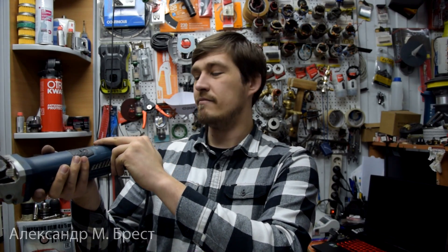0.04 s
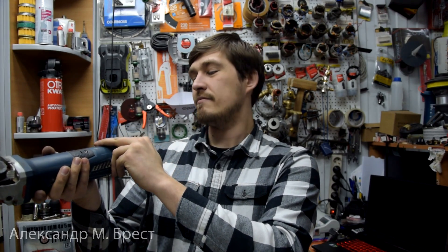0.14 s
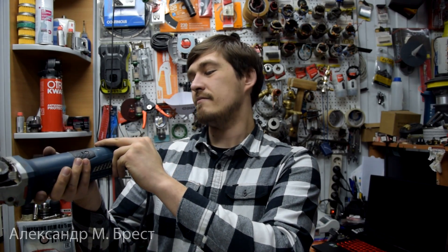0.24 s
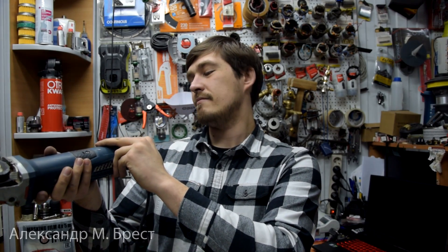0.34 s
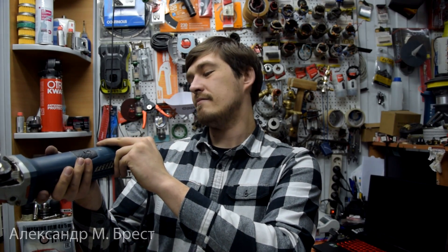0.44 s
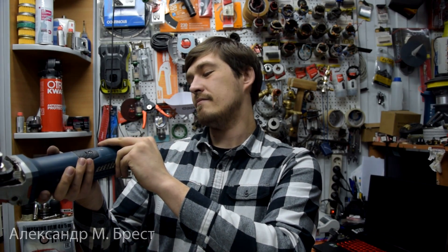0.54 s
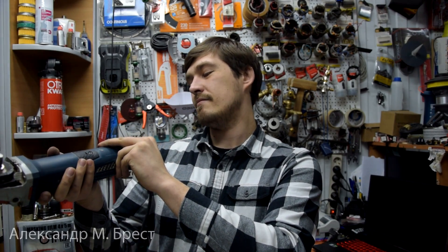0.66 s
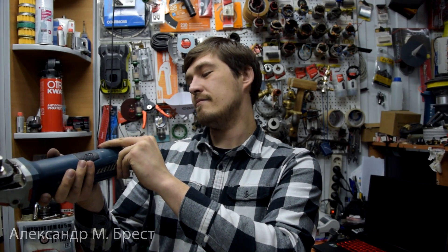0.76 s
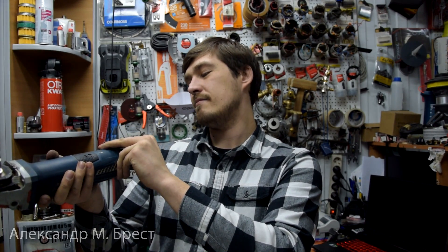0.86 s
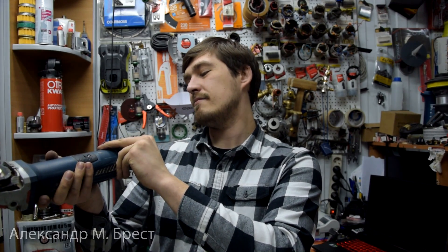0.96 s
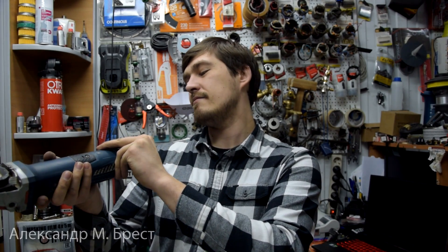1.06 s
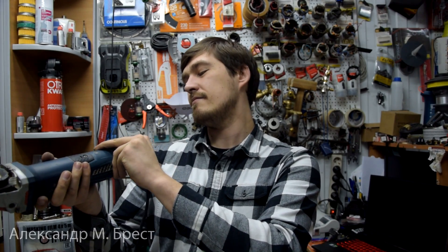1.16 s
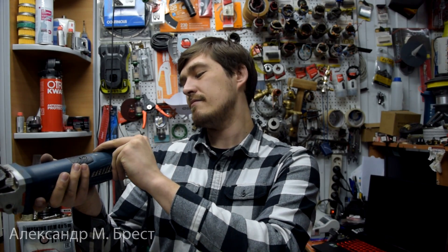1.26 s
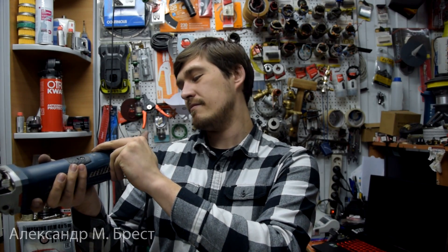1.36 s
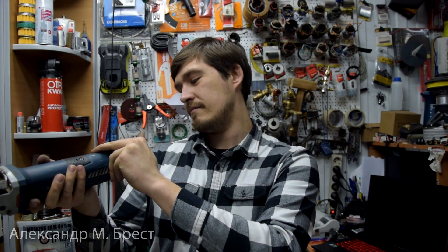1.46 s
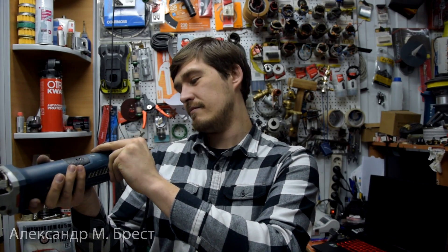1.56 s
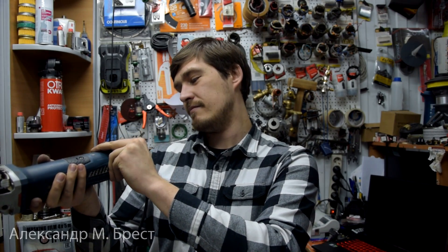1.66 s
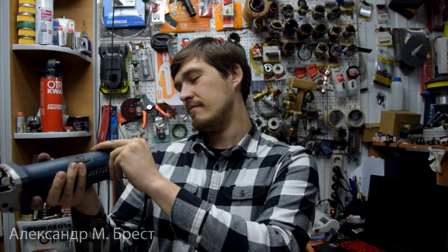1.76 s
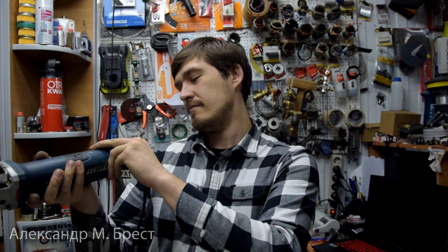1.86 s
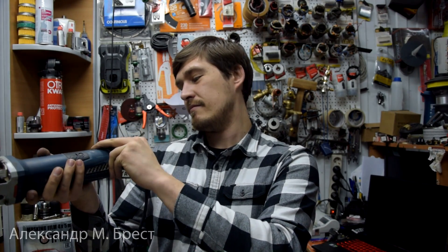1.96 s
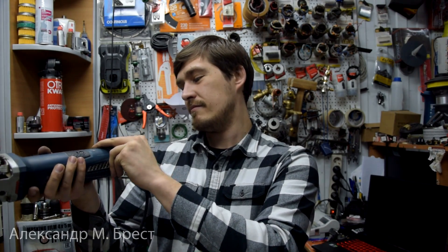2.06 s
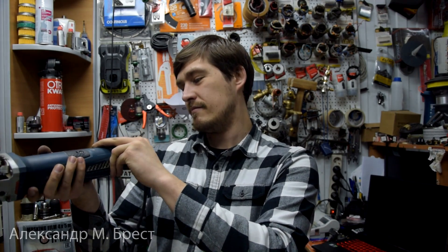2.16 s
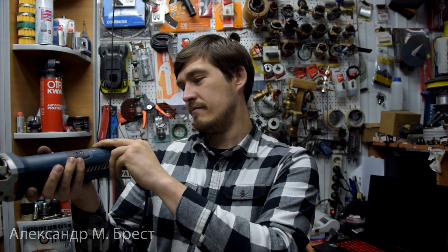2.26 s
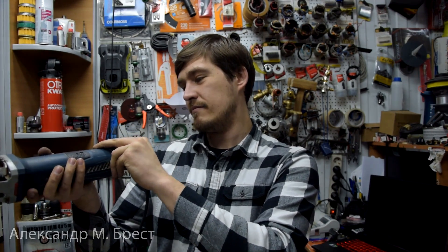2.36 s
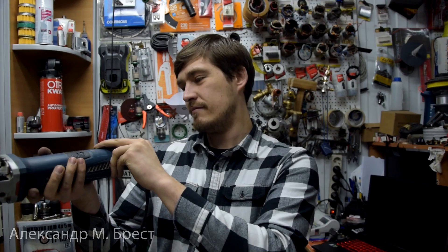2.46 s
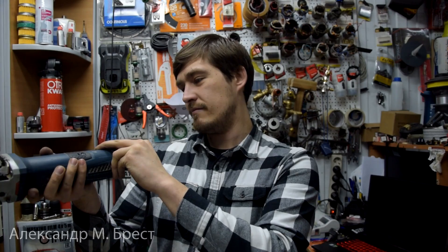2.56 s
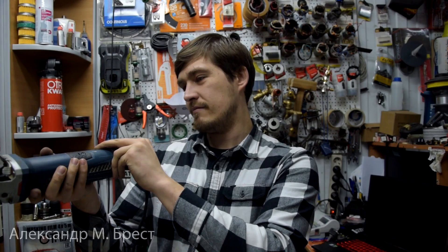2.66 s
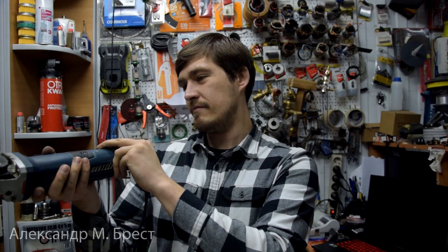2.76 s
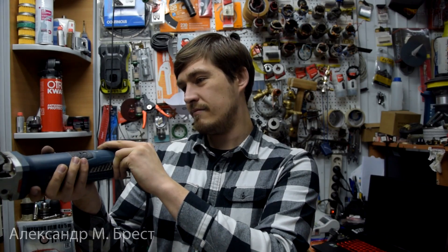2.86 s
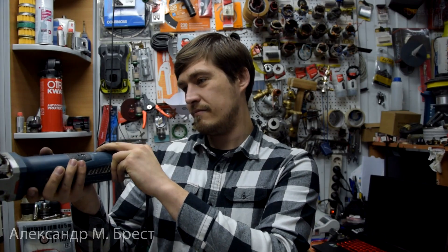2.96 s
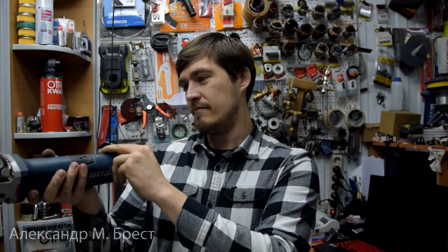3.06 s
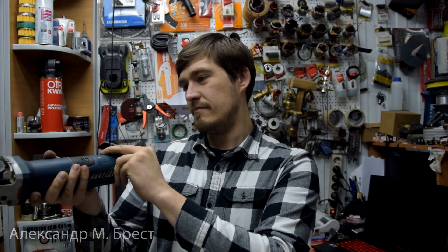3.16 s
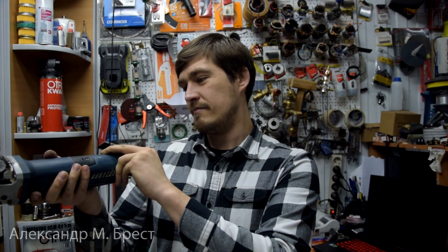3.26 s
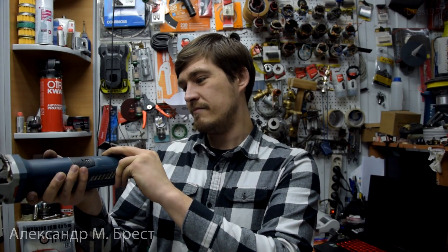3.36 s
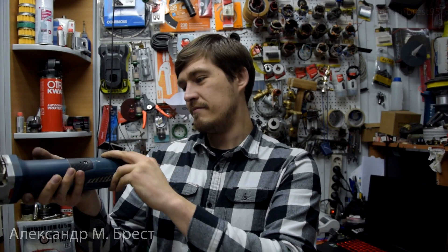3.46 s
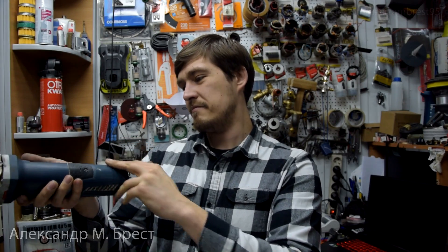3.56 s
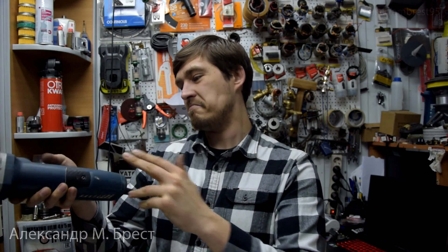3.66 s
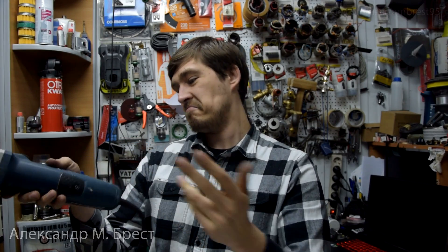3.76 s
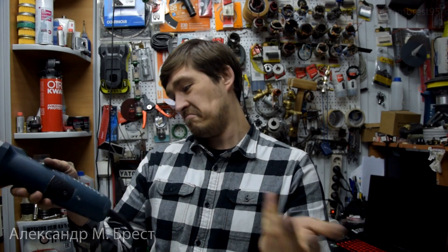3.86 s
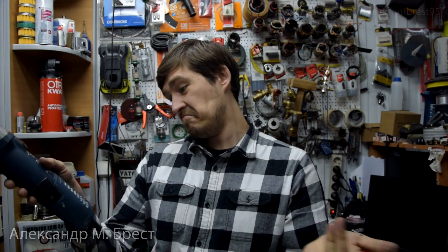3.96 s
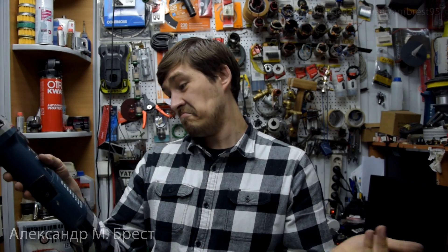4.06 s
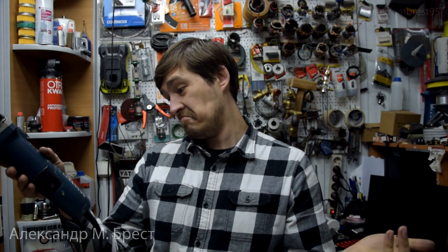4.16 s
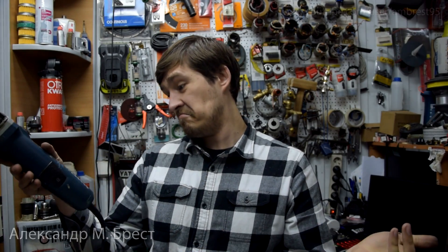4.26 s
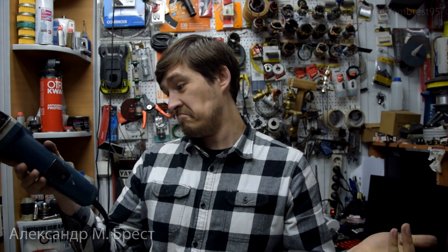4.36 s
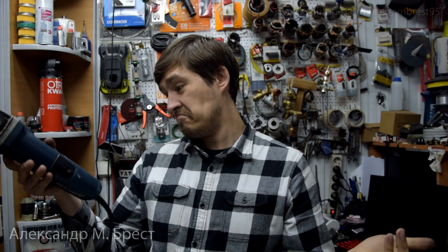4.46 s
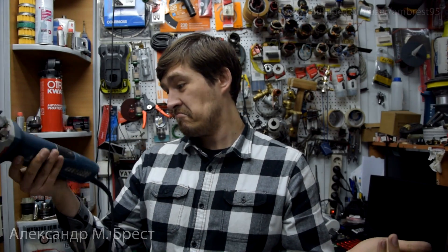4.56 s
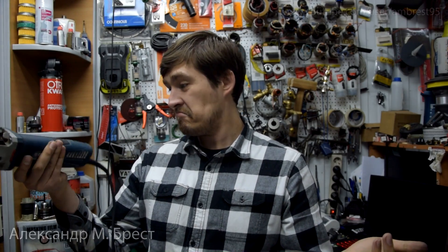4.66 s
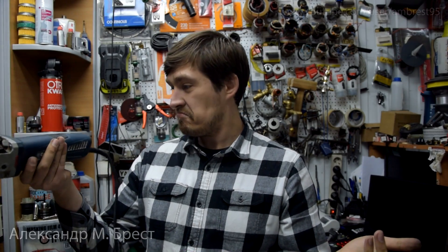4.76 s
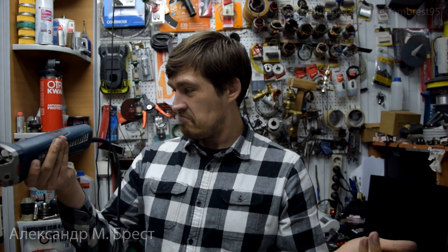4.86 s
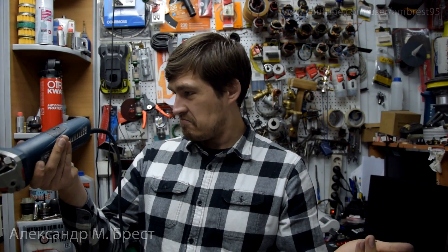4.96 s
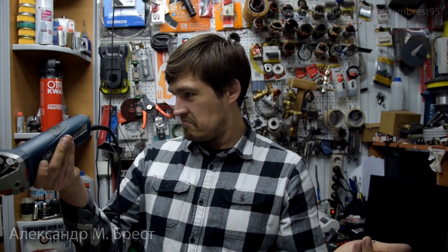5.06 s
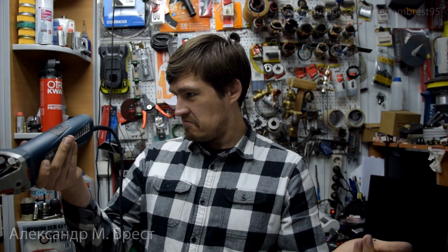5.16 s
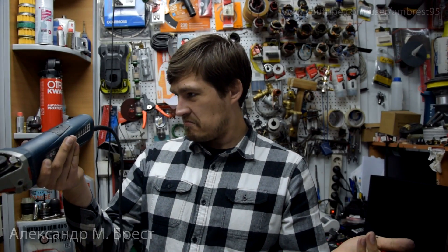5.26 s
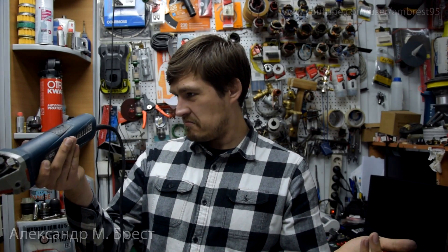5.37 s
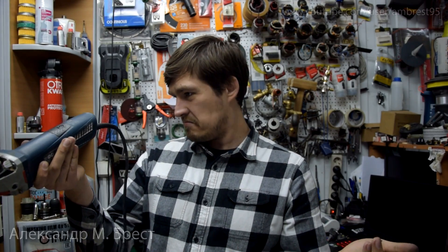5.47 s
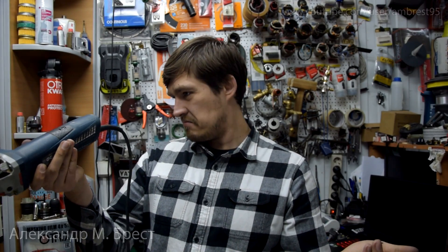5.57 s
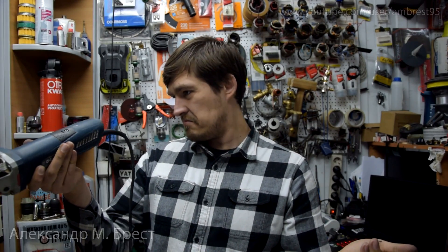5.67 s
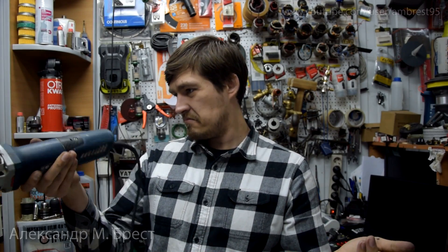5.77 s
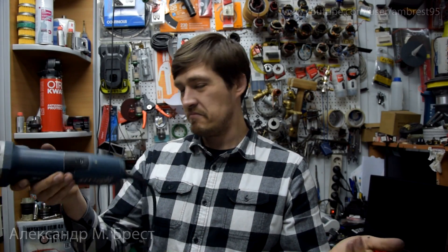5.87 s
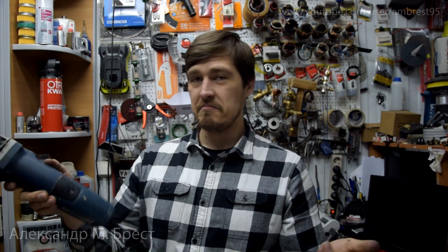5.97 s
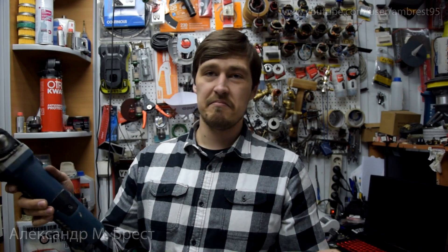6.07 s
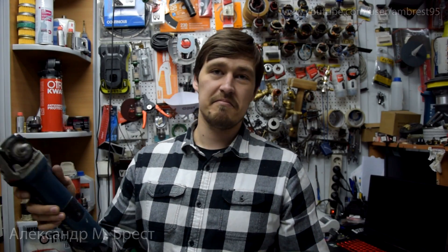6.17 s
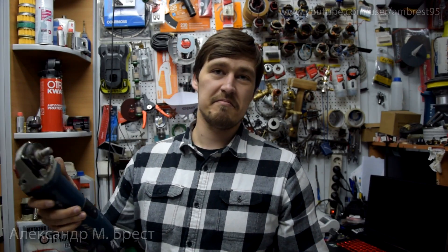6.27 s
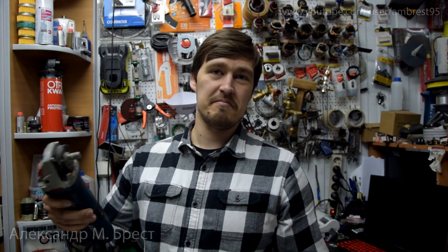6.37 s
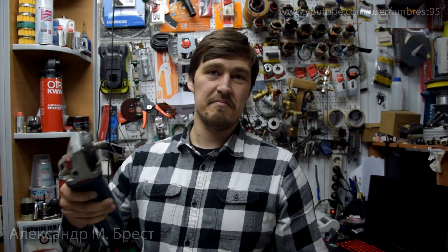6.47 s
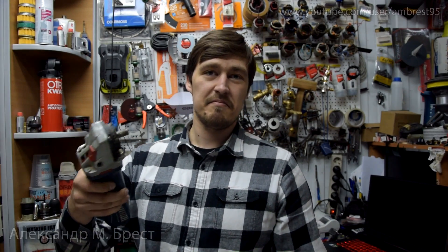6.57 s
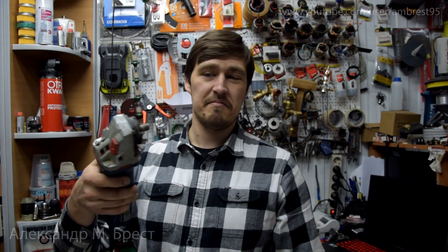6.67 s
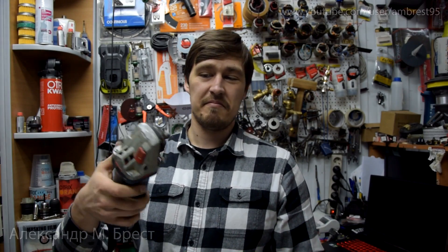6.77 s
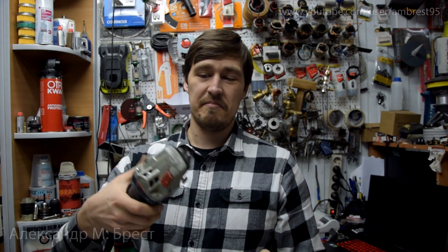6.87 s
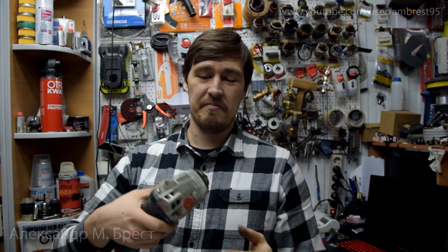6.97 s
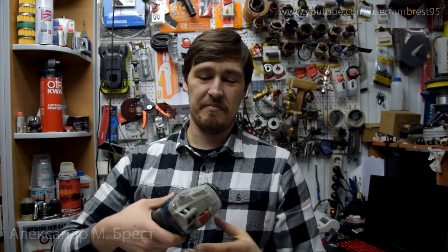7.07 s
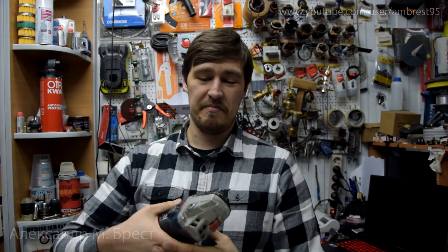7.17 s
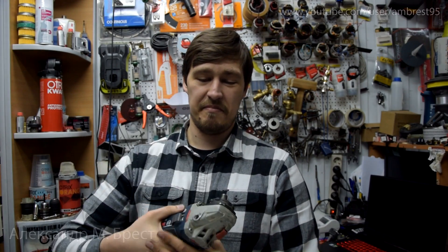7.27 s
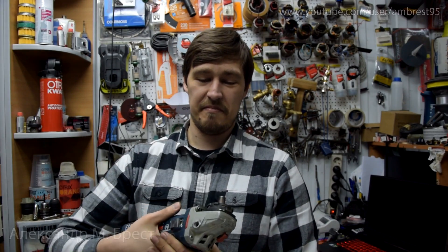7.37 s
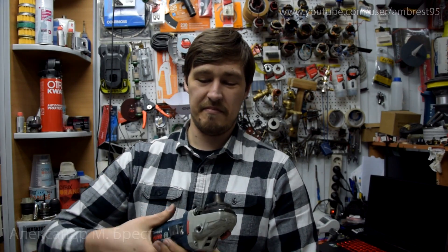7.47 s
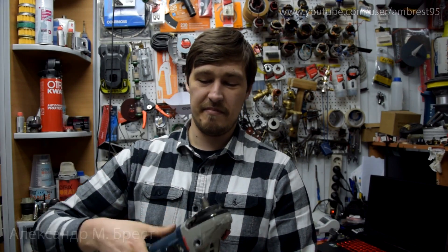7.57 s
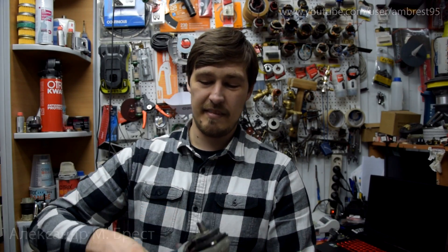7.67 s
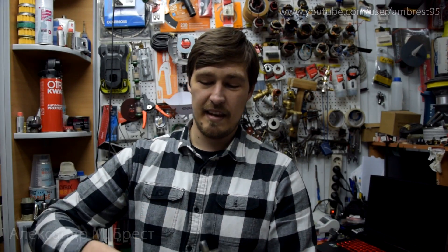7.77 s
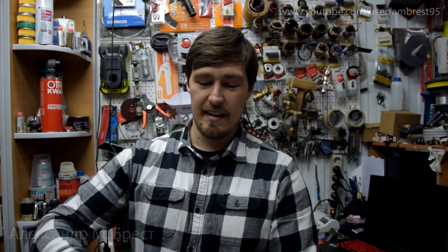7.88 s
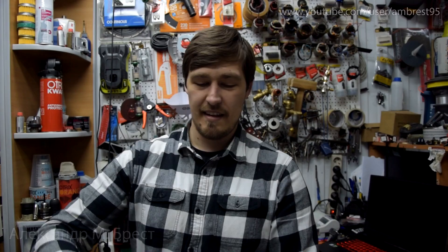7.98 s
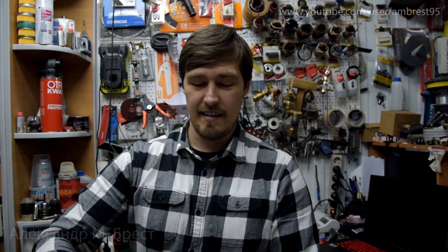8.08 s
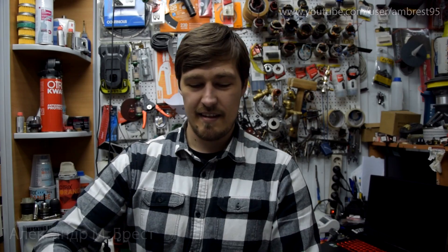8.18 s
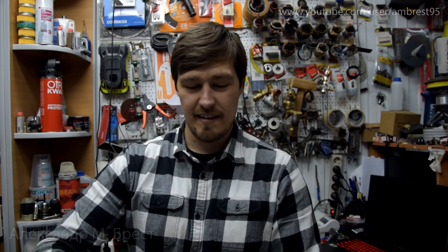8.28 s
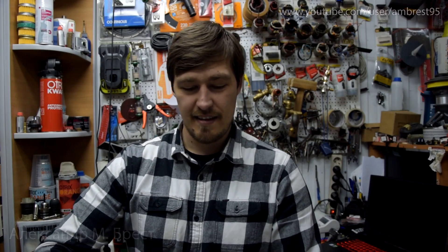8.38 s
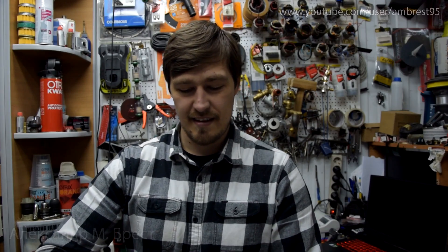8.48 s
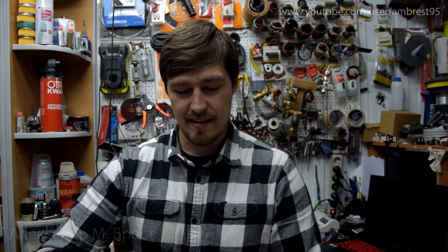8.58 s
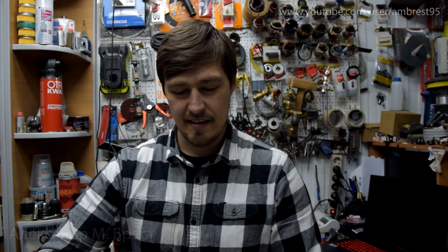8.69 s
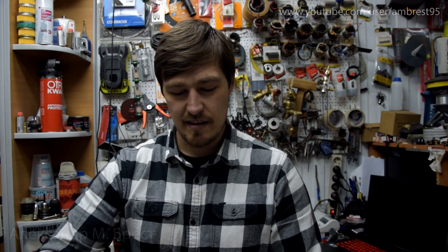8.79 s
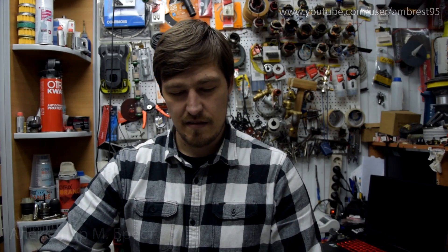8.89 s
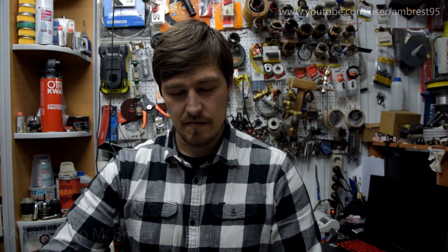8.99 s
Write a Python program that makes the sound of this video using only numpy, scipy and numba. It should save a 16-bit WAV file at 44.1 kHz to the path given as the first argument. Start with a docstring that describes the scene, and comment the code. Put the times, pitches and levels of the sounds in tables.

```python
"""An angle grinder runs without load in a small cluttered workshop, a metre from a stereo microphone.
Cooling air is shaped noise, whines are sines locked to the shaft, kicks, rattle and knocks ring resonances.
Short early spins give way to a rise to full speed; then the switch opens and the tool coasts, is laid on
the bench with a soft thud and knocks as it slows. Dense reflections and a low shop rumble lie behind it."""
import sys
import numpy as np
from scipy import signal
from scipy.fft import rfft, irfft, next_fast_len
from scipy.io import wavfile
from scipy.ndimage import uniform_filter1d
from numba import njit

SR = 44100
rng = np.random.default_rng(int(sys.argv[2]) if len(sys.argv) > 2 else 0)


def int16_out(signal):
    """Quantize to a 16-bit WAV file."""
    q = np.round(np.clip(np.atleast_2d(signal).T, -1, 1) * 32767)
    wavfile.write(sys.argv[1], SR, q.astype(np.int16))


N = 398223
T = np.arange(N) / SR  # seconds

BLADES, PINION_TEETH, CROWN_TEETH, MAINS_HZ = 36, 11, 37, 50
START_TURNS, FULL_TURNS = 368, 598.6  # armature, turns a second

# Motor: the armature heads for a new speed from each moment.
# Each row: start [s], goal [turns a second], time constant [s], current [0 off, 1 on].
DRIVE = [(0, 300, .33, 0), (.19, 343, .06, 1), (1.0, 101, 1.31, 0), (1.93, 330, .85, 1),
         (2.045, 101, 1.31, 0), (2.2, 1200, 1.67, 1), (2.8, 598.6, .12, 1), (6.712, -86, 2.177, 0)]
# Handling of the tool. Each row: time [s], stage [0 slow, 1 fast, 2 coasting, 3 laid on the bench].
STAGE = [(0, 0), (2.2, 0), (2.8, 1), (6.8, 1), (7.2, 2), (7.75, 2), (8.3, 3)]
# Tool turned and moved before the microphone. Each row: time [s], air gain [dB], bass share [dB],
# treble share [dB], left minus right [dB], middle share [dB].
POSE = [(0, -0.5, -3, 0, 3, 1), (.95, -0.5, -3.5, -0.5, 2, 2), (1.4, 0.5, -2.5, -1, 2.5, -1.5),
        (1.85, 3, -3, 0, 2, -3.5), (2.05, 3.5, 2, -3, 2.5, -1), (2.17, 7.5, -3, -2, 3, 0.5),
        (2.45, 3.5, -2, -0.5, 3, 1), (2.68, 4, -0.5, 0.5, 3, 1.5), (2.85, 1, 0.5, -1, 3, 1.4),
        (4.1, 0.5, 0, -4, 3.5, 0), (4.65, 0.24, -1, -0.5, 3, 0.7), (5.95, 0.9, -1, -2.5, 3.5, -0.5),
        (6.4, -0.25, 1, -0.5, 2, 1.5), (6.8, 1, 0, -2.5, 1, 2), (7.17, -2, -2, -7.5, -.5, 2.5),
        (7.9, 0, 0.5, -3, 0.5, -0.6), (8.45, 1, 1, 4.5, 0.5, -0.5), (9.03, 5, -3, 3, 1, 3)]

# Colour of the cooling air at low speed, at full speed, coasting in the hand and coasting on the bench;
# its overall level is set apart. Each row: frequency [Hz], relative density [dB per Hz].
AIR_SLOW = [(24, -69), (40, -52.5), (171, -24.5), (400, -11), (442, -18), (582, -2), (825, -0.5),
            (959, -4.5), (1300, -2.5), (1660, -7), (2200, -2), (2600, -6.5), (3300, -4), (3600, -4.5),
            (4300, -0.5), (5200, -4), (6500, -3.5), (7280, -6.5), (10900, -7.5), (15800, -30.5)]
AIR_FAST = [(24, -78), (40, -58), (335, -20), (410, -22.5), (526, -18), (596, -10.5), (868, -11.5),
            (1200, -4.5), (1620, -5), (2360, -1.5), (3190, -2.5), (5000, -2), (7280, -7.5), (10900, -7.5),
            (15800, -22)]
AIR_COAST = [(24, -58), (40, -33), (130, -33.5), (410, -12), (539, -15.5), (643, -7.5), (766, -3),
             (1660, -3.5), (2880, -4), (3520, -4), (7100, -7.5), (8700, -7.5), (10100, -2.5), (11600, -7.5),
             (15800, -23)]
AIR_LAID = [(24, -71), (40, -54), (296, -24), (344, -17.5), (400, -25.5), (539, -8), (596, -13), (643, -8),
            (800, -9), (983, -16), (2360, -11), (2740, -13), (4640, -9.5), (6580, -13.5), (7700, -21),
            (8050, -11.5), (8450, -17), (11000, -22.5), (15800, -53)]
# Resonances of housing and gear case in the air. Each row: centre [Hz], width [Hz], boost [dB].
HOUSING = [(412, 30, 6), (630, 70, 3), (970, 30, 6), (2250, 300, 2), (2660, 170, 2), (3750, 200, 1.5),
           (4300, 400, 1), (4950, 350, 3), (8700, 600, 1), (10800, 700, 2.5)]
AIR_DB, AIR_DB_PER_OCTAVE = -23.5, 14  # at full speed before the pose gain; fall per halving of speed
MIDDLE_HZ, MIDDLE_OCTAVES = 1450, 0.67  # centre and half width of the middle share

# Blade whine passing the resonances of the housing, before the two offsets below.
# Each row: blade frequency [Hz], level [dB].
WHINE = [(5400, -75), (6800, -69), (8800, -56.5), (9600, -54.5), (10200, -54), (10700, -50), (11300, -48),
         (11900, -47), (12400, -54), (13200, -52), (14100, -52), (14400, -64), (15500, -67)]
WHINE_POWERED_DB = -20  # the whine is masked while current flows
WHINE_TURNED_S, WHINE_TURNED_DB = 6.7, 3.5  # the vents face the microphone during the last run-down
# Armature unbalance, before its passing gain. Each row: multiple of a turn, level [dB].
WOBBLE = [(1, -52), (2, -50.5), (3, -46), (4, -38), (5, -48)]
BEARING_ORDER, HUM_HZ = 6.35, 640  # multiple of a turn; a steady pitch

# Passing sounds: gear teeth, the unbalance singing at steady full speed, a thin falling tone (perhaps
# a bearing), a thin hum while the tool lies on the bench.
# Each holds: start [s], rise [s], end [s], fall [s], gain [dB].
TEETH_HEARD = (.95, .15, 1.8, .2, -62.5)
WOBBLE_HEARD = (3.15, .4, 6.15, .5, 2.5)
BEARING_HEARD = (8.3, .25, 8.8, .7, -61.5)
HUM_HEARD = (8.0, .35, 8.6, 4, -57.5)

# Bouts of chopped current: hard surges, each ringing its own part, over a steady buzz.
# Each row: start [s], rise [s], end [s], fall [s], level [dB], resonance from [Hz], to [Hz],
# width [Hz], overtones [dB], fixed rings [dB].
KICKS = [(1.88, .05, 2.3, .1, -45, 3300, 3500, 900, -6, 3),
         (1.905, .02, 1.945, .05, -38, 4400, 4500, 500, -20, -8),
         (1.915, .06, 2.025, .07, -33, 2250, 3100, 1300, -2, -14),
         (1.925, .05, 2.025, .05, -38.5, 3500, 4000, 3000, -14, -8),
         (2.185, .02, 2.29, .1, -39, 4500, 5000, 4000, -10, -8),
         (2.165, .04, 2.225, .12, -32.5, 6250, 6300, 450, -20, -18),
         (2.175, .035, 2.31, .12, -30.5, 3550, 4300, 700, -14, -14),
         (2.22, .03, 2.265, .03, -48, 12600, 13700, 250, -30, -12),
         (2.222, .02, 2.28, .07, -33, 11000, 11150, 350, -30, -18),
         (2.29, .04, 2.4, .3, -36.5, 1900, 2100, 600, -9, -8),
         (2.31, .03, 2.39, .08, -38, 9000, 9200, 900, -30, -14),
         (2.25, .1, 6.7, .05, -40, 4900, 4900, 900, -9, -7)]
# Fixed rings under every kick. Each row: centre [Hz], width [Hz], level [dB].
KICK_RINGS = [(2000, 500, -6), (6200, 600, -2), (8900, 600, -4), (11100, 600, -3)]

# Modes of the gear case. Each row: centre [Hz], width [Hz], level [dB].
CASE = [(650, 130, -20), (1950, 170, 0), (2350, 220, -7), (3620, 240, 6), (4700, 350, -3), (5600, 400, -1)]
RATTLE_DB, RATTLE_DB_PER_OCTAVE = -34, 13.5  # gear backlash at full speed; fall per halving of speed
RATTLE_LAID_DB = -6  # the bench damps the scattered rattle

# Single gear knocks, placed by time, before the level of each mode.
# Each row: time [s], peak of the lower rings [dB], peak of the upper rings [dB].
PLACED_KNOCKS = [(7.74, -42, -36), (7.8827, -39, -36), (7.905, -40, -37), (7.9939, -36, -39),
                 (8.1077, -40, -40), (8.2062, -38, -43), (8.285, -37, -46), (8.4432, -35, -48),
                 (8.459, -36, -48), (8.546, -36, -46), (8.562, -37, -42), (8.582, -38, -46),
                 (8.600, -39, -45), (8.6165, -37, -44), (8.632, -38, -42), (8.6545, -34, -39),
                 (8.6787, -36, -41), (8.700, -38, -43), (8.7133, -37, -39), (8.7355, -38, -38),
                 (8.752, -43, -43), (8.764, -39, -44), (8.7799, -35, -36), (8.8008, -37, -40),
                 (8.8175, -37, -40), (8.8385, -40, -42), (8.858, -42, -43), (8.8787, -41, -45),
                 (8.8976, -42, -46), (8.9136, -39, -44), (8.948, -43, -48), (8.964, -43, -48),
                 (8.9855, -43, -46)]
# Slowing gears knock once a spindle turn. Same columns: time [s], lower rings [dB], upper rings [dB].
LOOSE_KNOCK_LEVEL = [(7.6, -44, -41), (7.9, -40, -40), (8.05, -43, -47), (8.2, -43, -55), (8.45, -38, -51),
                     (8.6, -39, -45), (8.78, -40, -41), (9.03, -46, -50)]
KNOCK_JITTER, KNOCK_SCATTER_DB = .06, 1.5  # spread: share of a turn, level
# The lower rings sink as the tool settles on the bench: share of pitch a second, time of true pitch, limit.
SAG_PER_S, SAG_TRUE_S, SAG_MOST = .55, 8.75, .2

THUD_S, THUD_HZ, THUD_DB, THUD_T60_S = 8.045, 160, -57, .15  # the tool is laid down
# Gusts of exhaust air on the microphone, before the left-right offset.
# Each row: start [s], rise [s], end [s], fall [s], level [dB].
PUFFS = [(7.15, .08, 7.46, .3, -67), (7.22, .06, 7.28, .08, -58)]

ROOM_T60_S, ROOM_DB, ROOM_BRIGHT = 0.52, -1, 0.63  # level before the treble tilt; tilt from 0 to 1
WHINE_ROOM_DB = -9  # the tones beam at the microphone and stir the room little
METAL_ROOM_DB = -5  # so do the small metal parts
METAL_LOW_CUT_HZ = 326

# Colour of the quiet shop. Each row: frequency [Hz], relative density [dB per Hz].
SHOP = [(25, -10), (45, -1.5), (75, 15), (120, -7), (250, -14), (1000, -26), (15000, -42)]
SHOP_DB = -78  # mean level while the tool is loudest
# The two microphone ports differ in colour. Each row: frequency [Hz], left minus right [dB].
PORTS = [(30, 3), (125, -.8), (250, 1.2), (500, .3), (3300, -.6), (4800, .3), (6300, 2.3), (7700, -1),
         (9200, -5), (11000, -1.8), (13500, 1)]
TOP_HZ = 15750


def motor():
    """Armature speed in turns a second, easing exponentially towards each goal, and smoothed current."""
    speed, power, now = np.empty(N), np.empty(N), START_TURNS
    ends = [row[0] for row in DRIVE[1:]] + [N / SR]
    for (start, goal, lag, on), end in zip(DRIVE, ends):
        span = (T >= start) & (T < end)
        speed[span] = goal + (now - goal) * np.exp((start - T[span]) / lag)
        power[span] = on
        now = goal + (now - goal) * np.exp((start - end) / lag)
    return speed, uniform_filter1d(power, size=SR // 20)


def air(level_db):
    """Turbulent cooling air: noise whose colour goes through four stages and shifts in patches."""
    hz, s, noise = signal.stft(rng.standard_normal(N), SR, nperseg=2048, noverlap=1536)
    octave, stage = np.log2(np.maximum(hz, 1))[:, None], curve(STAGE, s)[0]
    db = 0
    for k, table in enumerate((AIR_SLOW, AIR_FAST, AIR_COAST, AIR_LAID)):
        table_hz, table_db = np.transpose(table)
        share = np.clip(1 - abs(stage - k), 0, 1)
        db = db + share * np.interp(octave, np.log2(table_hz), table_db)
    for centre, width, boost in HOUSING:
        db = db + boost / (1 + (2 * (hz[:, None] - centre) / width) ** 2)
    # slow broad, small quick and wideband brief patches
    for spread_db, span in ((.8, (28, 30)), (.9, (8, 8)), (.8, (180, 2))):
        db = db + spread_db * patches(noise.shape, span)
    # hold the core band even, so that level_db alone sets the strength
    core = (hz > 1500) & (hz < 6500)
    db -= 10 * np.log10(np.sum(undb(db[core]) ** 2, axis=0) / len(hz))
    _, bass_db, treble_db, _, middle_db = curve(POSE, s)
    db += middle_db * np.exp(-((octave - np.log2(MIDDLE_HZ)) / MIDDLE_OCTAVES) ** 2)
    db += bass_db * np.clip(np.log2(1500) - octave, 0, 1)
    db += treble_db * np.clip(octave - np.log2(6000), 0, 1)
    roar = signal.istft(noise * undb(db), SR, nperseg=2048, noverlap=1536)[1][:N]
    return undb(level_db) * roar


def tone(turns, order, flicker_db):
    """A sine locked to the given turns, rms about 1, that wavers in strength and phase."""
    strength = np.sqrt(2) * undb(flicker_db * walk(5.7))
    return strength * np.sin(2 * np.pi * order * turns + .35 * walk(23))


def whines(turns, speed, power):
    """Periodic forces sing: passing blades, meshing teeth, unbalance, a late thin tone and a hum."""
    blade_db = curve(WHINE, BLADES * speed)[0] + WHINE_POWERED_DB * power
    blade_db = blade_db + WHINE_TURNED_DB * (T > WHINE_TURNED_S)
    blades = undb(blade_db) * tone(turns, order=BLADES, flicker_db=2.2)
    teeth = tone(turns, order=2 * PINION_TEETH, flicker_db=2.5)
    teeth = teeth + .6 * tone(turns, order=PINION_TEETH, flicker_db=2.5)
    wobble = sum(undb(db) * tone(turns, order=k, flicker_db=1.6) for k, db in WOBBLE)
    bearing = tone(turns, order=BEARING_ORDER, flicker_db=2.)
    hum = tone(T, order=HUM_HZ, flicker_db=3.)
    passing = gate(*TEETH_HEARD) * teeth + gate(*WOBBLE_HEARD) * wobble
    return blades + passing + gate(*BEARING_HEARD) * bearing + gate(*HUM_HEARD) * hum


def kicks():
    """The speed control chops each mains half-wave, jolting armature and gears into ringing."""
    jolt = unit(bursts(2 * MAINS_HZ * T + .3, .11, 1.6)) + .75 * rng.standard_normal(N)
    rings, out = unit(ring(jolt, KICK_RINGS)), 0
    for row in KICKS:
        start, _, end, _, _, from_hz, to_hz, width, overtone_db, rings_db = row
        hz, width = np.interp(T, [start, end], [from_hz, to_hz]), np.full(N, 1. * width)
        octave, third = [svf(jolt, np.minimum(k * hz, .45 * SR), width) for k in (2, 3.1)]
        slide = svf(svf(jolt, hz, 1.5 * width), hz, 1.5 * width)
        slide = slide + undb(overtone_db) * (octave + .12 * third)
        out = out + gate(*row) * (unit(slide) + undb(rings_db) * rings)
    return out


def rattle(turns, octaves):
    """A high spot of the crown wheel knocks about once a spindle turn, among scattered ticks."""
    spindle = turns * PINION_TEETH / CROWN_TEETH + 0.1 * walk(20.8)
    high_spot = unit(bursts(np.maximum.accumulate(spindle - spindle[0]), 0.04, 1.3))
    ticks = unit((rng.random(N) < .006) * rng.standard_normal(N))
    laid_db = RATTLE_LAID_DB * np.clip(curve(STAGE, T)[0] - 2, 0, 1)
    level_db = RATTLE_DB + RATTLE_DB_PER_OCTAVE * octaves + laid_db
    return undb(level_db) * unit(ring(high_spot + ticks, CASE))


def knock_times(turns):
    """One loose knock a spindle turn at low speed; a placed knock takes the place of its neighbour."""
    spindle = turns * PINION_TEETH / CROWN_TEETH
    first = np.ceil(np.interp(LOOSE_KNOCK_LEVEL[0][0], T, spindle))
    whole = np.arange(first, spindle[-1] - 1)
    chance = rng.standard_normal((3, len(whole)))
    s = np.interp(whole + KNOCK_JITTER * chance[0], spindle, T)
    levels_db = curve(LOOSE_KNOCK_LEVEL, s) + KNOCK_SCATTER_DB * chance[1:]
    loose = np.transpose([s, *levels_db])
    free = abs(s[:, None] - np.array(PLACED_KNOCKS)[:, 0]).min(axis=1) > .013  # seconds
    return np.vstack([PLACED_KNOCKS, loose[free]])


def knocks(turns):
    """Each soft push of about 1 ms rings the modes of the gear case, a little detuned every time."""
    out, t, rows = np.zeros(N), np.arange(600) / SR, knock_times(turns)
    chances = rng.standard_normal((len(rows), 2, len(CASE)))
    for (s, low_db, high_db), chance in zip(rows, chances):
        at = int(s * SR)
        sag = np.clip(SAG_PER_S * (SAG_TRUE_S - s), -SAG_MOST, SAG_MOST)
        for (hz, width, db), detune, phase in zip(CASE, *chance):
            swell = (1 - np.exp(-t / .0007)) ** 2 * np.exp(-np.pi * width * t)
            size = undb(db + (low_db if hz < 3000 else high_db)) * swell / swell.max()
            pitch = hz * (1 + .02 * detune + sag * (1000 < hz < 3000))
            knock = size * np.sin(2 * np.pi * pitch * t + 3 * phase)
            out[at:at + len(t)] += knock[:N - at]
    return out


def thud():
    """A soft low knock on the bench: one decaying sine."""
    t = np.maximum(T - THUD_S, 0)
    return undb(THUD_DB) * np.sin(2 * np.pi * THUD_HZ * t) * undb(-60 * t / THUD_T60_S)


def puff():
    """Low rumble of moving air, unrelated at the two ports and stronger on the left."""
    low_pass = signal.butter(2, 45, fs=SR, output="sos")
    low = signal.sosfilt(low_pass, rng.standard_normal((2, N)))
    return unit(low) * sum(gate(*row) for row in PUFFS) * undb([[5.], [-4.]])


def room(x):
    """Dense decaying reflections from shelves and walls, other ones at each port, that keep changing."""
    t, hop = np.arange(int(.25 * SR)) / SR, SR // 7
    out, padded = np.zeros((2, N + 5 * hop)), np.pad(x, (hop, 2 * hop))
    fade = np.sin(np.pi * np.arange(2 * hop) / (2 * hop))
    for start in range(0, N + hop, hop):  # a new set every seventh of a second, cross-faded
        tail = rng.standard_normal((2, len(t))) * undb(-60 * t / ROOM_T60_S) * (t > .002)
        tail *= undb(ROOM_DB) / np.sqrt(np.sum(tail ** 2, axis=1, keepdims=True))
        piece = padded[start:start + 2 * hop] * fade
        echo = signal.fftconvolve(piece[None], tail, axes=1)
        out[:, start:start + echo.shape[1]] += echo
    return signal.lfilter([1, -ROOM_BRIGHT], [1], out[:, hop:hop + N])  # treble reflects best


def shop(level_db):
    """Low rumble in the shop that swells unevenly and with the tool, unrelated at the two ports."""
    hz = np.fft.rfftfreq(N, 1 / SR)
    table_hz, table_db = np.transpose(SHOP)
    db = np.interp(np.log(hz + 1), np.log(table_hz), table_db)
    rumble = unit(irfft(rfft(rng.standard_normal((2, N))) * undb(db), N))
    swell_db = SHOP_DB + 2.2 * walk(6) + .35 * (level_db - level_db.max())
    return undb(swell_db) * rumble


def undb(db):
    """Amplitude factor of a level in dB."""
    return 10 ** (np.asarray(db) / 20)


def unit(x):
    """The signal scaled to rms 1."""
    return x / np.sqrt(np.mean(x ** 2))


def curve(table, at):
    """Columns of a table read, between its rows, at the given values of the first column."""
    key, *columns = np.transpose(table)
    return [np.interp(at, key, c) for c in columns]


def gate(start, rise, end, fall, db, *_):
    """Gain that climbs 30 dB over rise, fast at first, holds, and sinks 30 dB over fall."""
    missing, gone = np.clip(1 - (T - start) / rise, 0, 1), np.clip((T - end) / fall, 0, 1)
    return (missing < 1) * (gone < 1) * undb(db - 30 * (missing ** 2 + gone))


def patches(shape, span):
    """Smooth random field, spread 1, over bands and moments."""
    x = rng.standard_normal(shape)
    for axis in (0, 1):
        for _ in range(2):
            x = uniform_filter1d(x, span[axis], axis=axis)
    return x / x.std()


def walk(rate):
    """Random level, spread 1, that wanders about rate times a second."""
    return patches((1, N), (1, int(SR / rate)))[0]


def bursts(phase, width, scatter_db):
    """A short noise burst in every cycle of phase, each of its own size."""
    sizes = undb(scatter_db * rng.standard_normal(int(phase[-1]) + 1))
    part = phase % 1
    shape = part / width * np.exp(-part / width)
    return sizes[phase.astype(int)] * shape * rng.standard_normal(N)


@njit
def svf(x, hz, width):
    """State-variable band-pass with moving centre and width, gain 1 at the centre."""
    y, band, low = np.empty(len(x)), 0., 0.
    for i in range(len(x)):
        g, k = np.tan(np.pi * hz[i] / SR), width[i] / hz[i]
        v = (band + g * (x[i] - low)) / (1 + g * (g + k))
        band, low, y[i] = 2 * v - band, low + 2 * g * v, k * v
    return y


def ring(x, modes):
    """Sum of fixed resonances of alternating sign, all driven by x."""
    out = 0
    for k, (hz, width, db) in enumerate(modes):
        out = out + (-1) ** k * undb(db) * svf(x, np.full(N, 1. * hz), np.full(N, 1. * width))
    return out


def scene():
    """The tool, placed left to right, with its reflections, gusts and the shop behind."""
    speed, power = motor()
    turns, octaves = np.cumsum(speed) / SR, np.log2(speed / FULL_TURNS)
    gain_db, _, _, pan_db, _ = curve(POSE, T)
    level_db = AIR_DB + AIR_DB_PER_OCTAVE * octaves + gain_db
    roar, tones = air(level_db) + thud(), whines(turns, speed, power)
    # the kicks, rattle and knocks are heard without bass
    parts = kicks() + rattle(turns, octaves) + knocks(turns)
    metal = signal.sosfilt(signal.butter(3, METAL_LOW_CUT_HZ, "high", fs=SR, output="sos"), parts)
    near = (roar + tones + metal) * undb(np.array([pan_db, -pan_db]) / 2)
    reflected = room(roar + undb(WHINE_ROOM_DB) * tones + undb(METAL_ROOM_DB) * metal)
    return near + reflected + puff() + shop(level_db)


def record(dry):
    """The two ports differ a little in colour; the recorder cuts the top steeply."""
    size = next_fast_len(N)
    hz, db = np.transpose(PORTS)
    tilt_db = np.interp(np.log(np.fft.rfftfreq(size, 1 / SR) + 1), np.log(hz), db) / 2
    ports = irfft(rfft(dry, size) * undb([tilt_db, -tilt_db]), size)[:, :N]
    return signal.sosfilt(signal.ellip(10, .2, 80, TOP_HZ, fs=SR, output="sos"), ports)


dry = scene()
out = record(dry)
int16_out(out)
```